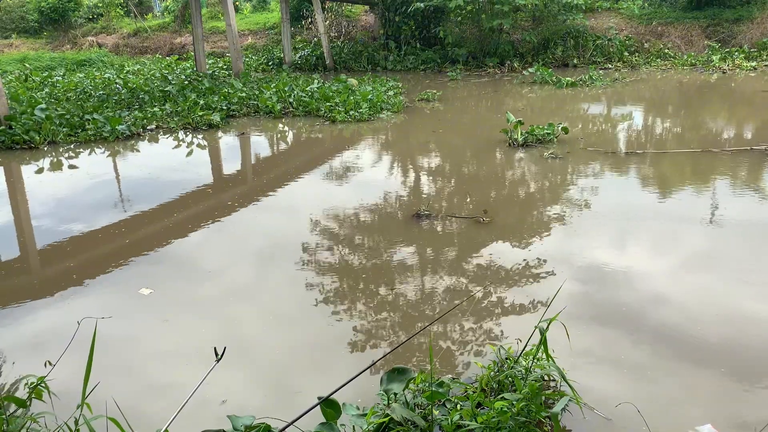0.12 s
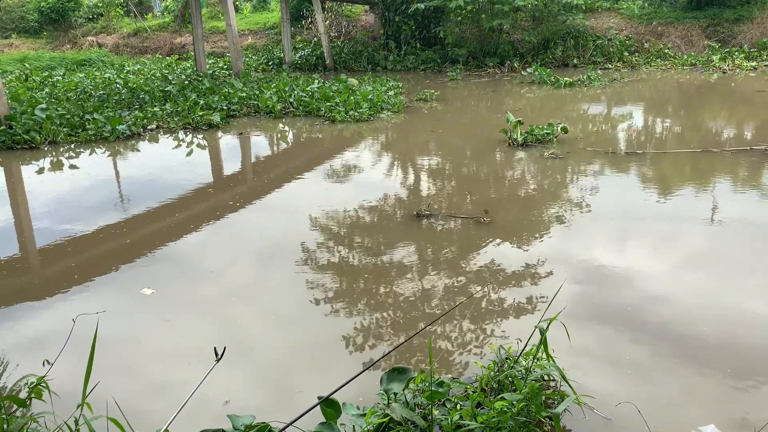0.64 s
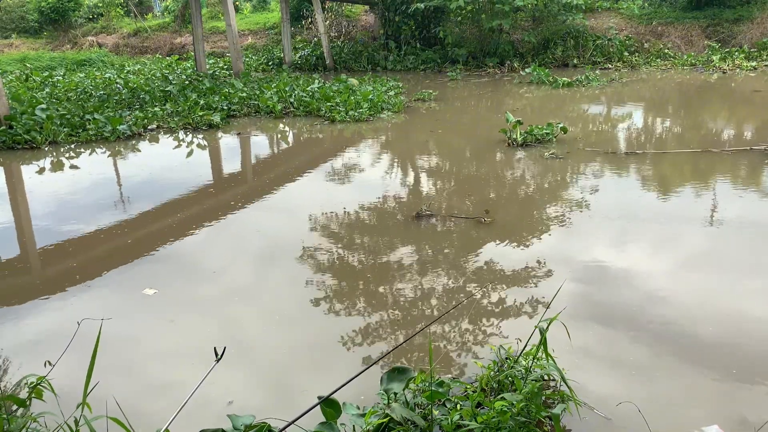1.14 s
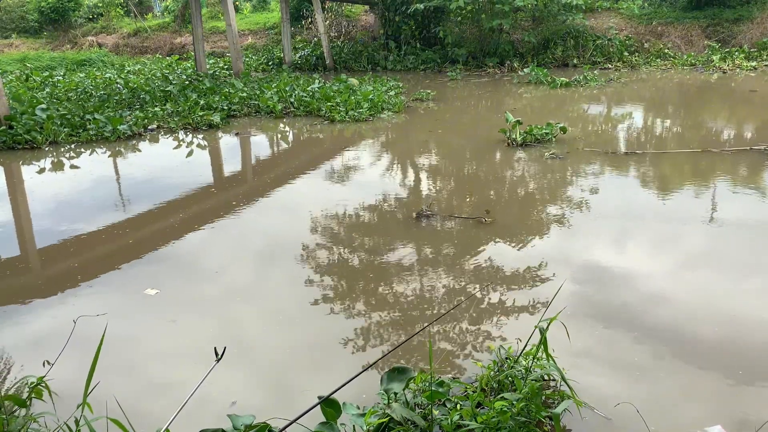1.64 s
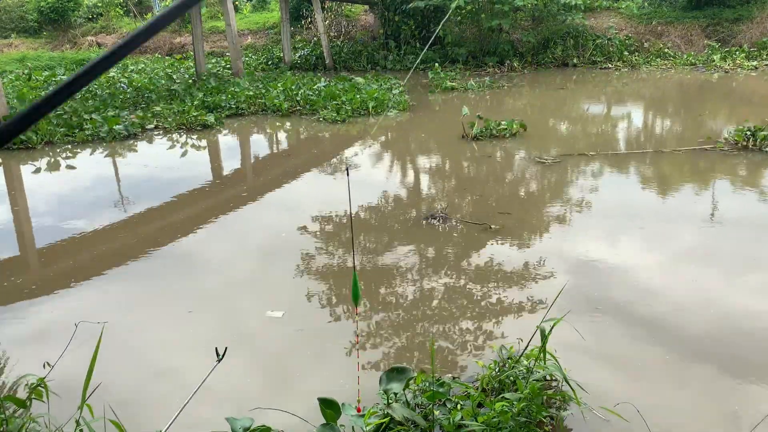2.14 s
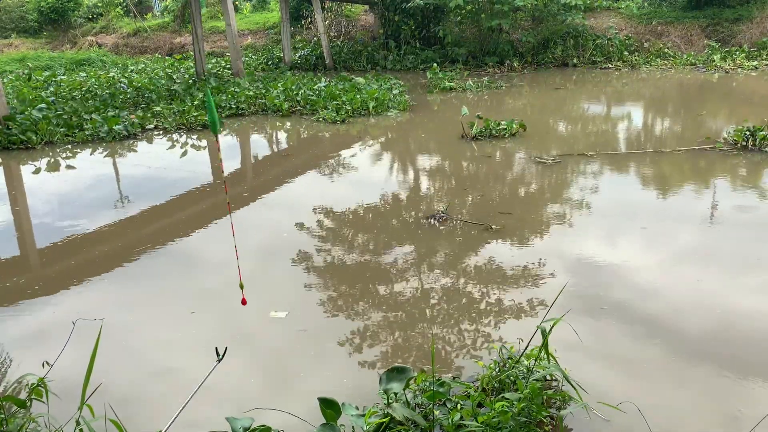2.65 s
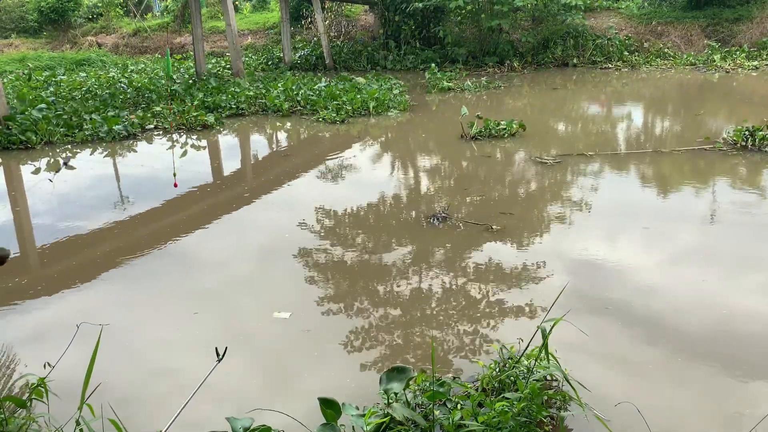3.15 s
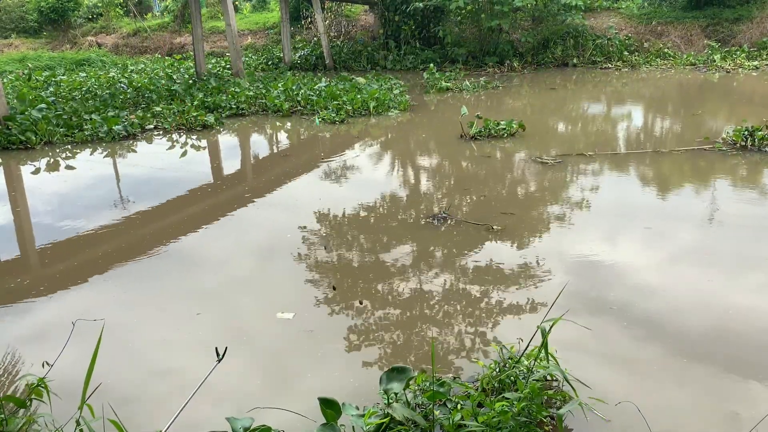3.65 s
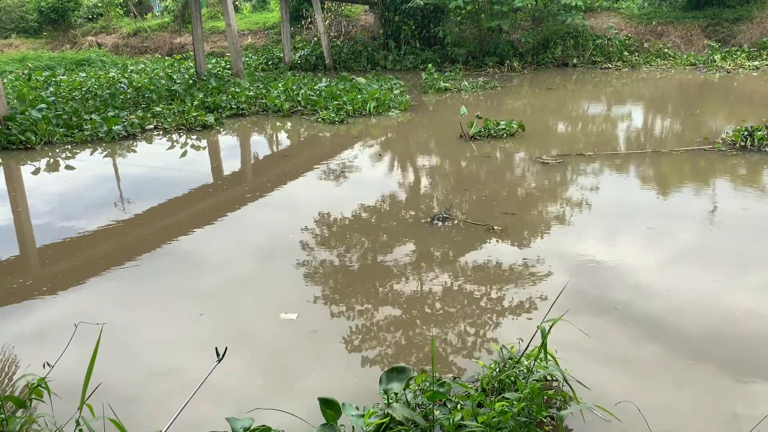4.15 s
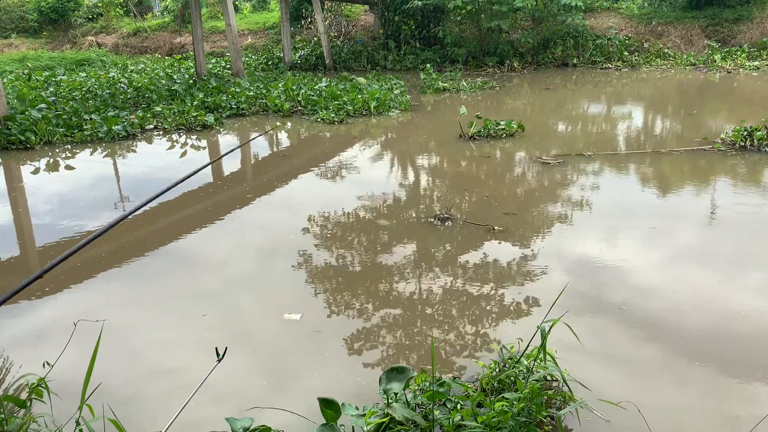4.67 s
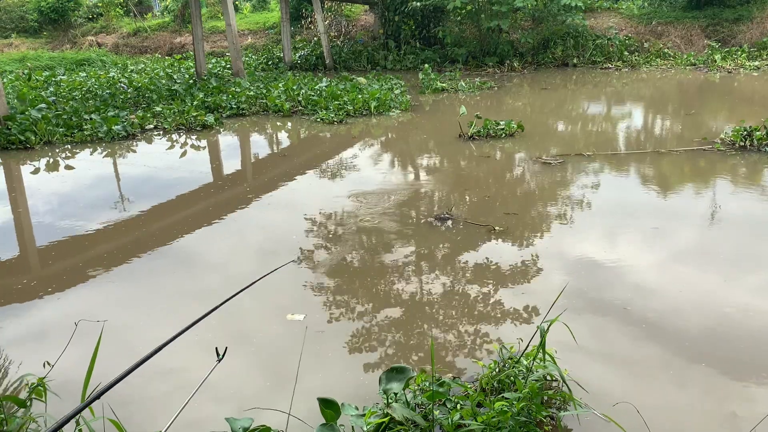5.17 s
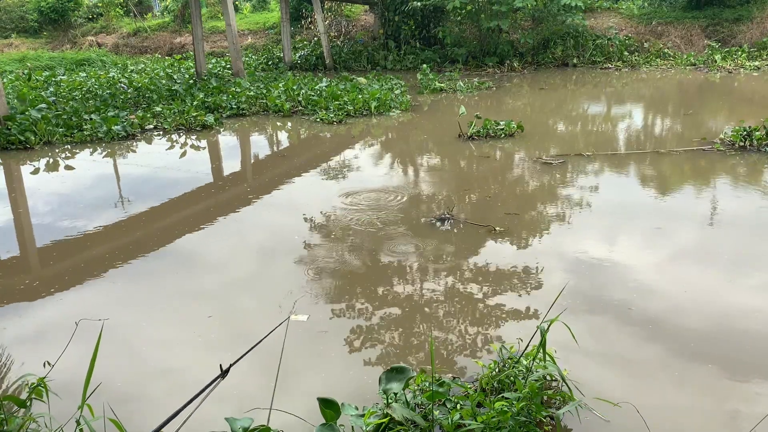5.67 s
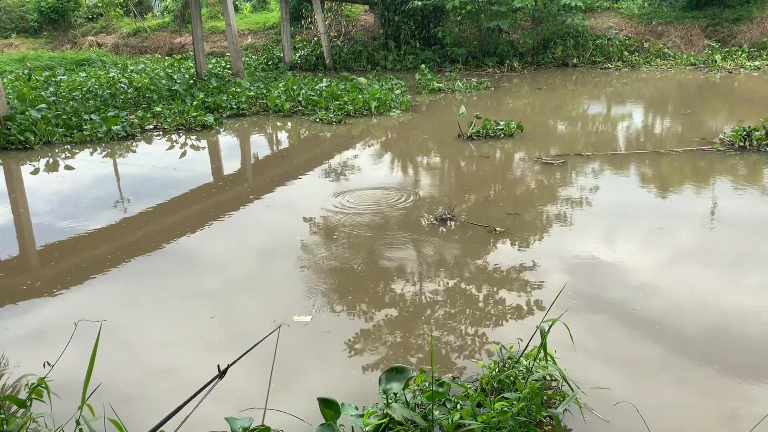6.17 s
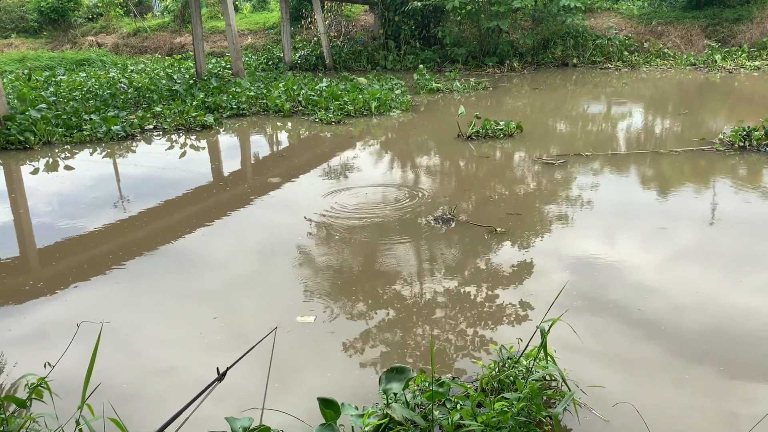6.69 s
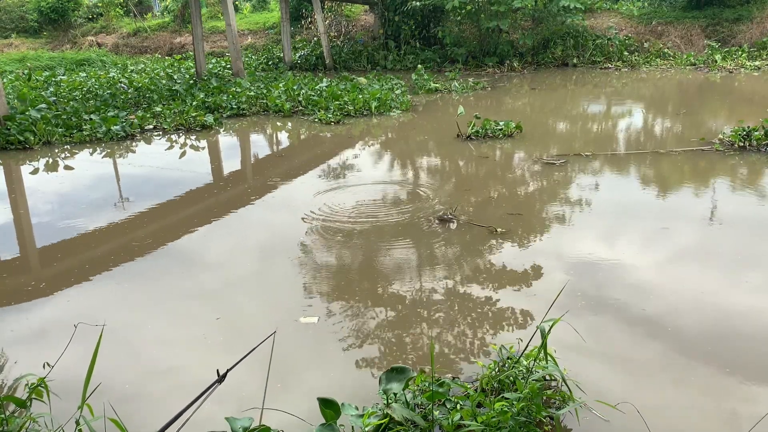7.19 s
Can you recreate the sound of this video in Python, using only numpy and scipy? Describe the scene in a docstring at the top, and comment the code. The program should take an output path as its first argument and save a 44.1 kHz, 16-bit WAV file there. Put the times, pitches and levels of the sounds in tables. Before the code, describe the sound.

Two vehicles growl past over water, joined by a sudden cut; the second fades away behind small sharp clicks and rustling grass.

```python
"""Two vehicles cross a bridge over a pond, one before and one after a splice, heard by two spaced microphones.
Each sums exhaust harmonics locked to its firings, road rumble, noise ringing in the casing, tyre hiss and a
rattle of small knocks. Behind them: a fishing rod's ticks (cracks and decaying modes, one high ping made as a
short gliding sine), a deck thud, rustling grass (noise grains), faint peeps (gliding sines), a far motor's hum
(a wavering sine), an insect on the right (narrow noise) and a far wash of coloured noise."""
import sys
import numpy as np
from scipy import signal
from scipy.fft import rfft, irfft
from scipy.io import wavfile
from scipy.ndimage import uniform_filter1d

SR = 44100
rng = np.random.default_rng(int(sys.argv[2]) if len(sys.argv) > 2 else 0)


def how_loud(loudness_db):
    """Turn decibels into a plain amplitude multiplier (0 dB gives 1, 20 dB gives 10)."""
    steps = np.asarray(loudness_db, float) / 20
    return 10 ** steps


def unload_audio(sound):
    """Save the sound as a 16-bit wav file, at the path given as the first command line argument."""
    columns = np.transpose(np.atleast_2d(sound))
    # keep every value between -1 and 1, then stretch to whole-number steps
    steps = np.round(np.clip(columns, -1, 1) * 32767)
    wavfile.write(sys.argv[1], SR, steps.astype(np.int16))


N = 322370
SPLICE_S = 2.0436

# exhaust of each pass: (time [s], firing rate [Hz], low exhaust level [dB], upper exhaust level [dB])
FIRST_PASS = [(0.0, 45.94, -34, -42.5), (0.24, 45.6, -40, -42), (0.94, 45.61, -37.5, -43),
              (1.22, 44.75, -39, -42.5), (1.43, 44.3, -36.5, -46.5), (1.82, 44.15, -40, -43.5),
              (2.04, 43.28, -40.5, -53.5)]
SECOND_PASS = [(2.06, 36.02, -38, -45.5), (2.45, 36.37, -37, -46), (2.78, 37.03, -32.5, -51),
               (3.052, 36.4, -36.5, -40.5), (3.22, 36.24, -40, -46), (4.12, 35.67, -33, -41),
               (4.22, 35.47, -41, -41), (4.97, 35.46, -38.5, -46), (5.19, 35.12, -41, -44.5),
               (5.77, 35.54, -39, -48.5), (6.2, 35.3, -41, -48.5), (6.79, 34.9, -41.5, -50.5),
               (7.16, 34.97, -38, -52.5)]
EXHAUST = FIRST_PASS + SECOND_PASS
# casing, rattle and tyres: (time [s], casing roar [dB], rattle [dB], rattle pitch [Hz], tyre hiss [dB])
ROAR = [(0.0, -49.5, -69, 4500, -55.5), (0.39, -47.5, -60.5, 4300, -54), (0.85, -48.5, -59.5, 4520, -53),
        (1.38, -49.5, -68, 4493, -52), (1.55, -47, -61, 4350, -51.5), (2.04, -50.5, -58.5, 4286, -53),
        (2.06, -51, -66, 4447, -52), (2.36, -51, -62, 4500, -58), (2.76, -51, -62, 4556, -58.5),
        (2.84, -46, -60, 4546, -57.5), (3.35, -49.5, -58, 4680, -51.5), (3.7, -50, -58, 4760, -52),
        (4.0, -48, -55.5, 4569, -56), (4.6, -50.5, -60, 4512, -56.5), (5.3, -55.5, -61.5, 4498, -58.5),
        (5.9, -62, -65, 4420, -61), (6.8, -63, -70, 4460, -64.5), (7.31, -66, -77, 4490, -64)]
# second vehicle turns from near to far colour: (start [s], end [s])
RECEDES_S = (3.56, 5.5)


def evened(x):
    """Scales to an rms of 1."""
    return x / np.sqrt(np.mean(x ** 2) + 1e-20)


def read(points, hz):
    """Reads a spectrum table on a log-frequency axis."""
    f, value = np.transpose(points)
    return np.interp(np.log(hz + 1), np.log(f + 1), value)


def coloured(x, points):
    """Filters x by a spectrum table in dB."""
    gain_db = read(points, np.fft.rfftfreq(N, 1 / SR))
    return irfft(rfft(x) * how_loud(gain_db), N)


def resonate(x, hz, width_hz):
    """Resonance of gain 1: shifts the curve hz down to zero, smooths, shifts back."""
    turn = np.exp(2j * np.pi * np.cumsum(hz * np.ones(len(x))) / SR)
    r = np.exp(-np.pi * width_hz / SR)
    return 2 * (turn * signal.lfilter([1 - r], [1, -r], x / turn)).real


def drift(hz, count=1):
    """Slow chance up to hz, rms 1: low-passed noise on a 256-sample grid, one row per count."""
    steps = rng.standard_normal((count, N // 256 + 2))
    smooth = signal.filtfilt(*signal.butter(2, min(hz * 512 / SR, .9)), steps)
    return np.array([np.interp(np.arange(N) / 256, np.arange(len(row)), evened(row)) for row in smooth])


def column(rows, index):
    """One control curve, sample by sample."""
    rows = np.array(rows)
    return np.interp(np.arange(N) / SR, rows[:, 0], rows[:, index])


def bursts(bed_db, rows):
    """Gain of a steady bed with bursts on top, powers added; rise and fall are linear in dB."""
    rise_share, fall_db = 0.63, -11  # rise time over fall time; level one length after the peak
    t = np.arange(0, N + 64, 64) / SR
    power = 0
    for peak_s, length_s, db in rows:
        away = np.where(t < peak_s, (peak_s - t) / rise_share, t - peak_s) / length_s
        power = power + how_loud(2 * (db + fall_db * np.minimum(away, 8)))
    return np.sqrt(how_loud(2 * bed_db) + np.interp(np.arange(N) / SR, t, power))


def vehicle(turns, strength):
    """All that moves along the bridge."""
    engine = exhaust(turns, strength) + casing(turns, strength)
    return engine + rumble() + tyres() + rattle(turns)


def exhaust(turns, strength):
    """Harmonics locked into one pulse a firing; each fades as its paths over road and water shift."""
    # exhaust harmonics, first vehicle coming and close, second near and far: (multiple of firing rate, level [dB])
    orders_coming = [(1, -11), (2, 4), (3, -9), (4, -32), (5, -7), (6, -18), (7, -13.5), (8, -9), (9, -7),
                     (10, -29), (11, -23), (12, -25)]
    orders_close = [(1, -12), (2, 4), (3, -2.5), (4, -15), (5, -11), (6, -9.5), (7, -17), (8, -12), (9, -7),
                    (10, -17), (11, -21.5), (12, -23)]
    orders_near = [(1, -17), (2, 0), (3, -0.5), (4, -9), (5, -7.5), (6, -2.5), (7, -8.5), (8, -13.5),
                   (9, -13), (10, -15.5), (11, -18), (12, -23)]
    orders_far = [(1, -21), (2, 3.5), (3, 0.5), (4, 3.5), (5, 1.5), (6, -8.5), (7, -20), (8, -16), (9, -27),
                  (10, -19), (11, -20), (12, -31)]
    # every second firing differs, adding tones half-way up to the next harmonic:
    # (harmonic below, first coming [dB], first close [dB], second near [dB], second far [dB])
    halves = [(1, -14, -19, -20, -14), (2, -10, -6.5, -24, -31), (9, -23, -19, -13.5, -17),
              (10, -26, -32, -25.5, -27)]
    # first exhaust turns from coming to close colour: (start [s], end [s])
    approaches_s = (0.7, 0.94)
    t = np.arange(N) / SR
    close = np.interp(t, approaches_s, [0, 1])
    far = np.interp(t, RECEDES_S, [0, 1])

    def colour_db(coming, passing, near, away):
        """Harmonic level along both passes."""
        return np.where(t < SPLICE_S, coming + close * (passing - coming), near + far * (away - near))

    boom, bark = boom_db() - 2.5, column(EXHAUST, 3) + 4
    out = np.zeros(N)
    tables = zip(orders_coming, orders_close, orders_near, orders_far, drift(5.5, count=12), drift(2.05, count=12))
    for (k, coming), (_, passing), (_, near), (_, away), fade, wobble in tables:
        level_db = (boom if k < 4 else bark) + colour_db(coming, passing, near, away)
        level_db = level_db + swell_db(k) + (1.46 + 0.2 * far) * fade
        # the pipe delays upper harmonics; echoes slowly turn each one
        spread_rad = 0.1193 * k ** 2 + (0.75 - 0.15 * far) * wobble
        out -= how_loud(level_db) * np.cos(2 * np.pi * k * turns - spread_rad)
    for (k, *levels_db), fade in zip(halves, drift(1.8, count=len(halves))):
        level_db = (boom if k < 4 else bark) + colour_db(*levels_db) + 2.6 * fade
        out += how_loud(level_db) * np.cos(2 * np.pi * (k + .5) * turns)
    return out * strength ** 0.78


def boom_db():
    """Level of the low exhaust with its brief dips."""
    # brief dips: (time [s], width [s], level [dB])
    dips = [(0.14, 0.098, -7), (2.47, 0.031, -14)]
    t = np.arange(N) / SR
    return column(EXHAUST, 2) + sum(db * np.exp(-((t - s) / width_s) ** 2) for s, width_s, db in dips)


def swell_db(multiple):
    """Sum of the momentary swells and fades of one harmonic."""
    # swells and fades: (time [s], multiple of firing rate, width [s], level [dB])
    swells = [(.1, 3, 0.11, -1), (.3, 9, 0.051, -4), (.3, 8, 0.072, -7), (.5, 2, 0.1, -6),
              (.55, 3, 0.16, 13.5), (.6, 5, 0.14, 1.5), (.72, 3, 0.075, -16), (.72, 12, .12, 10),
              (.5, 6, 0.31, 4), (.5, 7, .4, 2), (.6, 4, 0.28, 4), (.95, 11, 0.23, 9.5), (1.0, 9, 0.17, 4.5),
              (1.25, 6, 0.32, 5), (1.7, 10, 0.15, 9), (1.7, 7, 0.22, -10), (1.7, 2, 0.064, -8),
              (2.2, 4, .15, -1), (2.3, 7, 0.25, 4.5), (2.5, 8, .4, 0), (2.599, 6, 0.23, 2.5),
              (2.55, 3, 0.066, -14), (2.8, 4, 0.11, -10), (2.8, 5, .12, -12), (2.8, 6, 0.096, 3),
              (2.9, 3, 0.26, -0.5), (3.1, 6, 0.11, 3.5), (3.4, 5, 0.11, 9.5), (3.4, 7, 0.12, 4),
              (3.5, 3, 0.19, 6.5), (3.5, 6, 0.13, -11), (3.6, 5, 0.053, -2), (3.7, 9, 0.2, 7.5),
              (3.7, 8, 0.19, 5.5), (3.8, 3, 0.11, -11), (4.0, 10, 0.087, 9), (4.2, 4, 0.095, 5),
              (4.2, 7, 0.17, -7), (4.4, 3, 0.063, 8), (4.75, 2, 0.13, -11), (4.8, 4, 0.069, 4),
              (5.0, 2, 0.079, 4.5), (5.199, 5, 0.099, 1.5), (5.58, 3, 0.11, 2), (5.8, 2, 0.11, -9),
              (5.95, 3, 0.16, 3), (6.1, 4, .15, -1), (6.4, 5, 0.066, -5), (6.6, 3, 0.15, -4),
              (7.0, 4, 0.077, -6), (7.0, 2, 0.11, -11)]
    t = np.arange(0, N + 256, 256) / SR
    db = 0 * t
    for s, k, width_s, peak_db in swells:
        if k == multiple:
            db = db + peak_db * np.exp(-((t - s) / width_s) ** 2)
    return np.interp(np.arange(N) / SR, t, db)


def casing(turns, strength):
    """Combustion noise ringing in the engine casing; each resonance flutters and slides alone."""
    # broad roar: (frequency [Hz], density [dB per Hz])
    roar_colour = [(290, 0.5), (500, -15), (641, -21), (767, -0.5), (839, 3.5), (1110, 3), (1360, 1.5),
                   (2410, -6), (2600, -9.5), (3380, -38), (5720, -120)]
    # casing modes, by vehicle: (frequency [Hz], width [Hz], near level over roar [dB], far level [dB])
    modes_first = [(795, 40, -11, -7), (1164, 100, -11.5, -8), (1338, 32, -9.5, -10), (1492, 57, -19, -9),
                   (1633, 120, -8.5, -6), (1990, 62, -13.5, -14)]
    modes_second = [(857, 60, -11.5, -8.5), (1010, 110, -17.5, -11), (1320, 64, -18, -25),
                    (1450, 33, -20.5, -32), (1525, 140, -22, -7), (1752, 40, -14.5, -11.5),
                    (1980, 270, -32, -18.5)]
    # roar surges: (peak time [s], length [s], level [dB])
    surges = [(0.594, 0.088, -58), (0.95, 0.15, -44.5), (1.19, 0.2, -47), (1.75, 0.12, -57),
              (1.933, 0.11, -49.5), (2.218, 0.048, -54), (2.857, 0.23, -51.5), (3.503, 0.24, -47.5),
              (4.15, 0.075, -50), (5.468, 0.055, -56), (5.7, 0.081, -61), (5.95, .1, -67)]
    wander = 0.016  # rms share of mode frequency
    noise = rng.standard_normal(N) * strength ** 0.45 * np.exp(-(turns % 1) / 6.9)
    roar = evened(coloured(noise, roar_colour))
    t = np.arange(N) / SR
    before = t < SPLICE_S
    far = np.interp(t, RECEDES_S, [0, 1])
    for modes, heard in ((modes_first, before), (modes_second, ~before)):
        chances = zip(modes, drift(3.4, count=len(modes)), drift(2.6, count=len(modes)))
        for (hz, width_hz, near_db, far_db), flutter, slide in chances:
            ring = evened(resonate(noise, hz * (1 + wander * slide), width_hz))
            roar += heard * how_loud(near_db + far * (far_db - near_db) + 1.8 * flutter) * ring
    return bursts(column(ROAR, 1) + 0.33 * drift(15)[0], surges) * roar


def rumble():
    """Road and deck noise under the exhaust, following its level."""
    # road rumble: (frequency [Hz], density [dB per Hz])
    rumble_colour = [(15, -32), (25, -19), (59, 1), (93, -2.5), (208, -9.5), (264, -16), (349, -17.5),
                     (480, -41.5), (700, -23.5), (910, -43), (1540, -120)]
    # rumble offset: (time [s], level [dB])
    deck = [(0, -1), (1.2, 0), (2.0, -1.5), (3.5, 1), (5.3, 0), (6.4, -0.4), (7.31, -0.5)]
    low_db = -37.5 + 0.2 * (boom_db() + 33) + column(deck, 1)
    low = evened(coloured(rng.standard_normal(N), rumble_colour))
    upper = evened(resonate(resonate(rng.standard_normal(N), 316, 310), 318, 310))
    return how_loud(low_db) * low + how_loud(column(EXHAUST, 3) - 6.5) * upper


def tyres():
    """Hiss of the tread: coloured noise with a quick flutter."""
    # tyre hiss: (frequency [Hz], density [dB per Hz])
    tread = [(1500, -32), (2100, 1), (3000, 3.5), (3900, 0), (5500, -8.5), (7500, -24)]
    hiss = evened(coloured(rng.standard_normal(N), tread))
    return hiss * how_loud(column(ROAR, 4) + 1.6 * drift(23)[0])


def rattle(turns):
    """Loose metal: clumps of small knocks ring short modes."""
    # rattle modes: (multiple of rattle pitch, width [Hz], level [dB])
    modes = [(.98, 530, 14), (1.08, 94, 7), (.74, 510, -10)]
    # rattle flares: (peak time [s], length [s], level [dB])
    shakes = [(0.538, 0.045, -54), (0.876, 0.095, -50), (3.379, 0.054, -53), (3.632, .05, -51),
              (3.756, 0.15, -48), (4.067, 0.11, -53), (4.149, 0.1, -54), (5.45, 0.045, -55),
              (5.681, 0.11, -59), (5.91, 0.079, -59), (6.0, 0.084, -61), (6.143, 0.079, -59),
              (6.259, .08, -61)]
    busy = np.exp(-(turns % 1) / 1.2) * how_loud(3.1 * drift(25)[0])
    knocks = rng.standard_normal(N) * (rng.random(N) < 3000 * busy / SR)
    pitch_hz = column(ROAR, 3)
    ring = np.zeros(N)
    for k, width_hz, db in modes:
        ring += how_loud(db) * resonate(resonate(knocks, k * pitch_hz, width_hz), k * pitch_hz, 2 * width_hz)
    return bursts(column(ROAR, 2) + 0.72 * drift(12)[0], shakes) * evened(ring)


def microphones(direct, scattered):
    """Direct sound reaches the two microphones at unlike times; the right adds a share scattered by the banks."""
    # left-right likeness: (frequency [Hz], coherence)
    likeness = [(25, 0.67), (60, 0.98), (200, 0.99), (500, 0.68), (1200, 0.85), (3000, 0.5), (6000, 0.28)]
    # left minus right: (frequency [Hz], level [dB])
    balance = [(60, 1), (150, -4), (380, 1), (950, 2.5), (2380, 0.5), (5980, 0), (15000, -4)]
    # sound bends round the case; deep bass comes from the whole road: (frequency [Hz], factor on the lead)
    detour = [(130, 0.58), (300, 1.4), (640, 1.32), (1500, 0.97), (4000, 1)]
    hz, t, z = signal.stft([direct, scattered], SR, nperseg=1024, noverlap=768)
    z = z * how_loud(paths_db(hz, t))
    half_turn = np.exp(1j * np.pi * hz[:, None] * lead_s(t) * read(detour, hz)[:, None])
    same = np.clip(read(likeness, hz), 0, 1)[:, None]
    half_tilt = how_loud(read(balance, hz) / 2)[:, None]
    left = z[0] * half_turn * half_tilt
    right = (same * z[0] + np.sqrt(1 - same ** 2) * z[1]) / half_turn / half_tilt
    return signal.istft(np.array([left, right]), SR, nperseg=1024, noverlap=768)[1][:, :N]


def lead_s(t):
    """Broadband lead of the left microphone: the sound path between the two times the sine of the bearing."""
    # passes: (time abreast [s], time to travel the bridge's distance [s], negative = from the left)
    passes = [(2.1, -2), (2.75, 1.71)]
    spacing_s = 0.45e-3
    along = np.where(t < SPLICE_S, *[(t - abreast_s) / travel_s for abreast_s, travel_s in passes])
    return spacing_s * along / np.sqrt(1 + along ** 2)


def paths_db(hz, t):
    """Colour of the way over the water: two moving bands, flares, and short narrow streaks above the bass."""
    # mostly dark band, perhaps the water echo cancelling the direct sound: (time [s], centre [Hz], level [dB])
    shade = [(0.2, 2310, -2), (1.2, 2470, 1), (2.04, 2380, -1), (3.2, 2380, -1.5), (3.7, 2105, -3),
             (4.4, 1483, -3), (5.4, 1243, 3), (7.31, 1247, -5)]
    # mostly bright band sliding in the hiss: (time [s], centre [Hz], level [dB])
    glow = [(0.1, 2820, 0), (0.36, 3150, 4.5), (0.55, 4100, 0.5), (1.0, 3900, -1.5), (1.6, 2890, 2),
            (1.68, 2300, -2), (1.74, 1483, 1), (2.04, 1710, 4.5), (2.06, 2700, -1), (2.6, 2760, 6),
            (3.7, 3440, -3), (4.15, 3440, 4.5), (4.6, 3020, 2), (4.9, 1990, -1.5), (5.2, 1881, 4.5),
            (5.65, 1800, 1), (5.95, 2600, 3), (6.3, 2490, 1), (7.31, 2400, 0)]
    # one band stands out or dips for a moment: (time [s], centre [Hz], width [s], level [dB])
    flares = [(.72, 1550, 0.046, 7), (.95, 1560, .06, 6), (.95, 1150, 0.087, -2), (1.22, 1660, 0.087, 2.5),
              (1.58, 814, 0.14, 3.5), (1.75, 1500, 0.06, 5), (1.93, 2100, .05, 7), (2.88, 1590, 0.092, 3)]
    streaks = rng.standard_normal((len(t), len(hz))).T
    streaks = evened(uniform_filter1d(uniform_filter1d(streaks, size=3, axis=0), size=16, axis=1))
    total_db = 1.5 * streaks * np.clip(hz / 600, 0, 1)[:, None] ** 2
    for s, centre_hz, width_s, db in flares:
        octaves = np.log2((hz[:, None] + 1) / centre_hz)
        total_db = total_db + db * np.exp(-(octaves / 0.097) ** 2 - ((t - s) / width_s) ** 2)
    return total_db + band_db(shade, 0.098, hz, t) + band_db(glow, 0.25, hz, t)


def band_db(rows, width_octaves, hz, t):
    """A moving bump or dip over frequency and time."""
    s, centre_hz, db = np.transpose(rows)
    octaves = np.log2((hz[:, None] + 1) / np.interp(t, s, centre_hz))
    return np.interp(t, s, db) * np.exp(-(octaves / width_octaves) ** 2)


def rod():
    """Each tick is a sharp crack and a short ring of the hollow rod."""
    # ticks: (time [s], crack level [dB], ring level [dB], brightness [dB per octave], factor on ring time,
    # lead of the right [ms])
    ticks = [(4.6206, -30, -52, 1, .2, 0), (4.6505, -31, -47, -6, .25, 0), (4.6582, -60, -42, -4, .27, 0),
             (4.6685, -46, -58, 3, .3, 0), (4.6727, -42, -64, 8, .3, 0),
             (5.4376, -34, -39.5, 1.5, .4, .061), (5.4415, -44, -58, 6, .8, .069),
             (5.4730, -70, -52, -40, .4, .056)]
    # rod modes: (frequency [Hz], level [dB], t60 before the tick's factor [s])
    modes = [(1650, -9, .08), (2270, 4, .056), (3070, -5, .028), (3850, 0, .04), (4450, -5, .045),
             (5800, -12, .018), (7700, -8, .01), (10710, -14, .013)]
    out, t = np.zeros((2, N)), np.arange(2000) / SR
    for s, crack_db, ring_db, bright_db, lasting, lag_ms in ticks:
        width_s = .00009 / how_loud(bright_db)  # a harder contact is shorter
        u = t / width_s - 2
        crack = (1 - 2 * u ** 2) * np.exp(-u ** 2)
        ring = np.zeros(len(t))
        for hz, db, t60_s in modes:
            mode_db = db + bright_db * np.log2(hz / 2300) - 60 * t / (t60_s * lasting)
            ring += how_loud(mode_db) * np.sin(2 * np.pi * hz * t)
        tick = how_loud(crack_db) * crack + how_loud(ring_db) * ring
        for side, late_ms in zip(out, (lag_ms, 0)):
            side[round((s + late_ms / 1000) * SR):][:len(t)] += tick
    return out


def thump():
    """One soft low thud of the deck: a sine under a bell-shaped envelope."""
    # thud: (time [s], width [s], frequency [Hz], level [dB])
    thud = (.27, .06, 70, -30)
    s, width_s, hz, db = thud
    t = np.arange(N) / SR - s
    return how_loud(db) * np.exp(-(t / width_s) ** 2) * np.sin(2 * np.pi * hz * t)


def from_right(x):
    """The left microphone hears it later and a little softer."""
    right_first_ms = .295
    return np.array([how_loud(-2.5) * np.roll(x, round(right_first_ms * SR / 1000)), x])


def rustle():
    """Grass, leaves and clothes: dense fine grains of uneven size, partly from one spot on the right."""
    # steady bed: (time [s], level [dB])
    bed = [(0.0, -69), (0.4, -60), (1.7, -60.5), (2.04, -61), (2.45, -56.5), (2.9, -54), (4.0, -54.5),
           (4.3, -59.5), (5.4, -62), (6.5, -64), (7.31, -69)]
    # grain colour: (frequency [Hz], density [dB per Hz])
    grain_colour = [(1500, -1), (3000, 3), (5900, 5), (7300, -2), (8500, 5), (10300, -0.5), (13300, 2.5),
                    (16000, -7)]
    # single brushes through the grass: (peak time [s], length [s], level [dB])
    brushes = [(.51, .08, -53), (0.846, 0.09, -53.5), (2.084, 0.075, -51), (2.213, 0.16, -49.5),
               (2.312, 0.12, -53.5), (3.361, 0.098, -52), (3.759, 0.08, -53), (4.078, 0.15, -49.5),
               (4.653, 0.051, -51.5), (5.439, 0.011, -43.5), (5.458, 0.046, -55), (6.15, .1, -61),
               (6.553, 0.061, -57.5), (6.863, 0.058, -65), (7.02, 0.05, -63), (5.7, 0.12, -65)]
    grains = rng.standard_normal((3, N)) * how_loud(2.6 * np.minimum(rng.exponential(1, (3, N)), 5))
    pair = grains[:2] + 1.1 * from_right(grains[2])
    level = bursts(column(bed, 1), brushes)
    return level * how_loud(0.66 * drift(25)) * evened(coloured(pair, grain_colour))


def peeps():
    """Short broken whistles, barely over the roar, plus the brief high ping of the rod's tick at 4.658 s:
    gliding sines."""
    # peeps, and at 4.6577 s the rod tick's brief high ping: (time [s], length [s], start [Hz], end [Hz], level
    # [dB])
    whistles = [(1.952, 0.11, 1630, 1596, -47.5), (2.156, .014, 3050, 2980, -48),
                (2.181, 0.051, 3600, 3770, -50), (2.214, 0.023, 2700, 2780, -49),
                (2.226, .011, 3230, 3260, -46), (4.6577, 0.0019, 8200, 8360, -43),
                (4.694, 0.018, 2620, 2560, -54), (4.725, 0.022, 2610, 2560, -53),
                (5.677, .02, 1690, 1600, -58)]
    breaks_hz = 67.6
    out = np.zeros(N)
    for s, length_s, start_hz, end_hz, db in whistles:
        size = round(length_s * SR)
        turns = np.cumsum(np.linspace(start_hz, end_hz, size)) / SR + rng.random()
        broken = abs(np.cos(np.pi * breaks_hz * np.arange(size) / SR - rng.random())) ** 0.35
        envelope = how_loud(db) * broken * signal.windows.tukey(size, .5)
        out[round(s * SR):][:size] += envelope * np.sin(2 * np.pi * turns)
    return out


def hum():
    """A far motor: a thin tone, wavering in pitch and level."""
    # hum: (time [s], level [dB])
    levels = [(0, -81), (4.9, -72), (5.5, -54.5), (6.7, -56.5), (7.0, -60), (7.31, -56)]
    turns = np.cumsum(339 * (1 + 0.0045 * drift(2.43)[0])) / SR  # 339 Hz
    return how_loud(column(levels, 1) + 2.0 * drift(10.0)[0]) * np.sin(2 * np.pi * turns)


def insect():
    """A fuzzy whistle from the right: noise through two equal narrow resonances."""
    centre_hz, width_hz, level_db = 8110, 300, -72
    song = resonate(resonate(rng.standard_normal(N), centre_hz, width_hz), centre_hz, width_hz)
    return from_right(how_loud(level_db + 1.0 * drift(3.1)[0]) * evened(song))


def air():
    """Smooth far outdoor wash, unlike in the two microphones."""
    # wash: (frequency [Hz], density [dB per Hz])
    wash = [(180, -22), (300, -12.5), (400, 1), (840, -9), (2300, -20), (3200, -17), (6600, -23.5),
            (8600, -25), (10300, -30.5), (14000, -29)]
    return how_loud(-55) * evened(coloured(rng.standard_normal((2, N)), wash))


def scene():
    """Both passes, the bank and the angler."""
    turns = np.cumsum(column(EXHAUST, 1) * (1 + 0.0018 * drift(6.66)[0])) / SR
    firings = rng.standard_normal(400)
    strength = how_loud(0.98 * np.interp(turns, np.arange(len(firings)), firings))  # no two firings are equal
    passes = microphones(vehicle(turns, strength), vehicle(turns, strength))
    return passes + rod() + thump() + rustle() + peeps() + hum() + insect() + air()


def roll_off(x):
    """The treble ends steeply here."""
    return signal.sosfilt(signal.butter(12, 15680, fs=SR, output="sos"), x)


def record(dry):
    """Shapes the top treble; the splice leaves a moment of silence and a quick fade-in."""
    # top treble, dipping near 12 kHz and falling away above 14 kHz: (frequency [Hz], level [dB])
    top_treble = [(11000, 0), (11400, -11.5), (12200, -11), (12450, -0.5), (13800, -9.5), (14600, -11),
                  (15500, -33)]
    gap_s, fade_s = .0045, .004
    t = np.arange(N) / SR
    splice = np.where(t < SPLICE_S, 1, np.clip((t - SPLICE_S - gap_s) / fade_s, 0, 1))
    return roll_off(coloured(dry, top_treble) * splice)


dry = scene()
out = record(dry)
unload_audio(out)
```